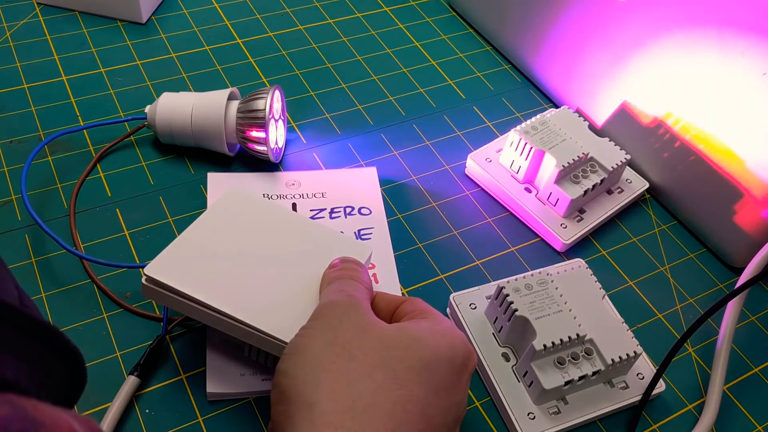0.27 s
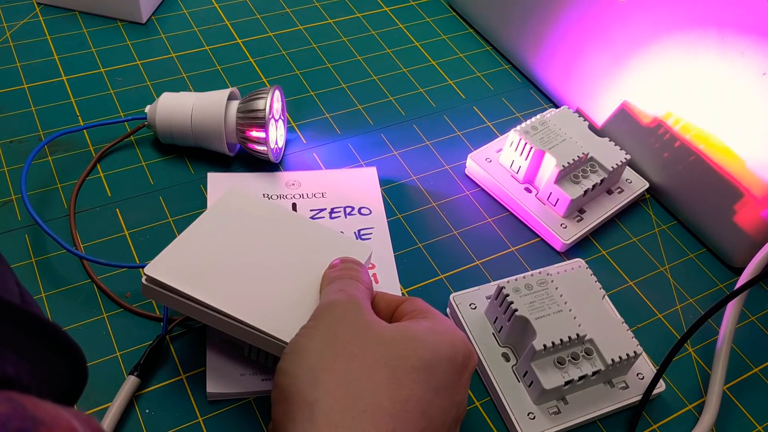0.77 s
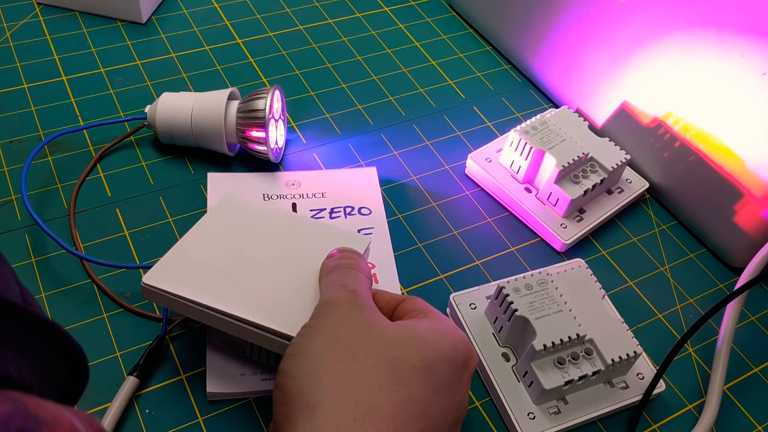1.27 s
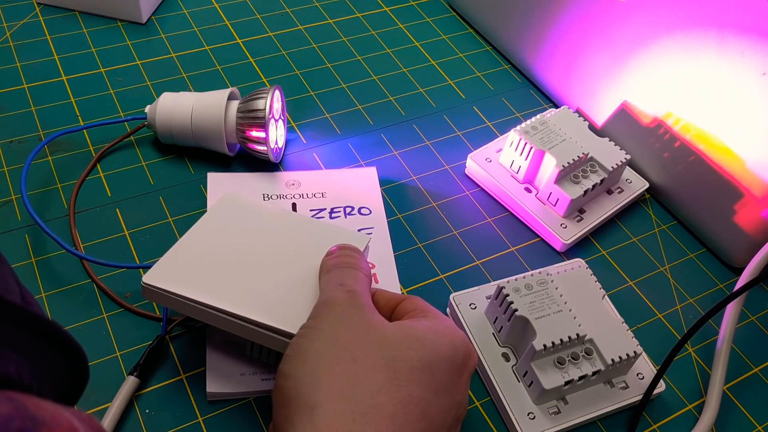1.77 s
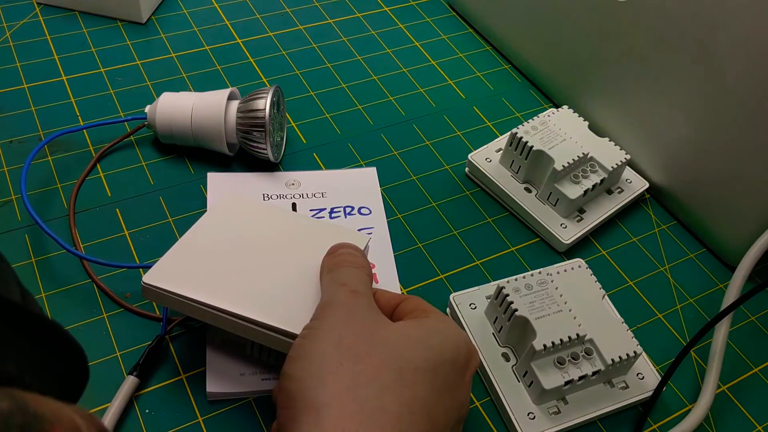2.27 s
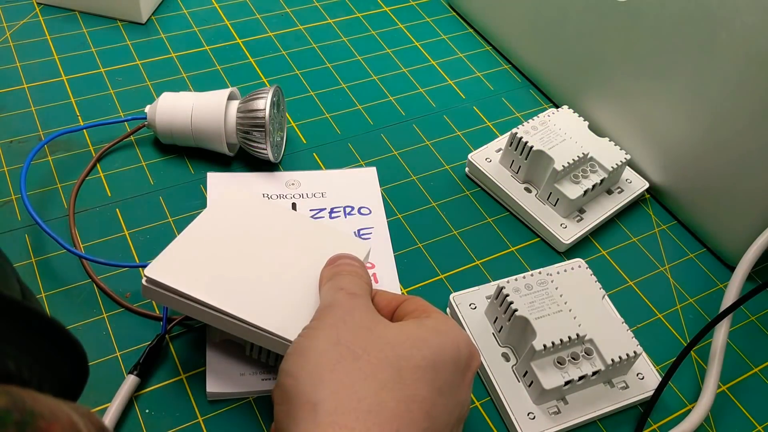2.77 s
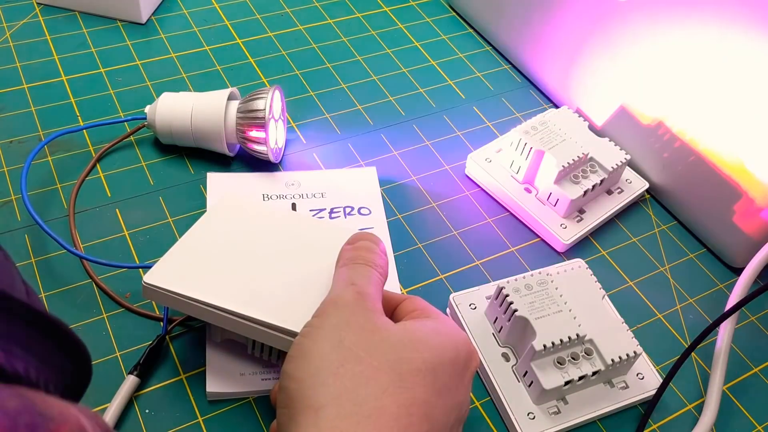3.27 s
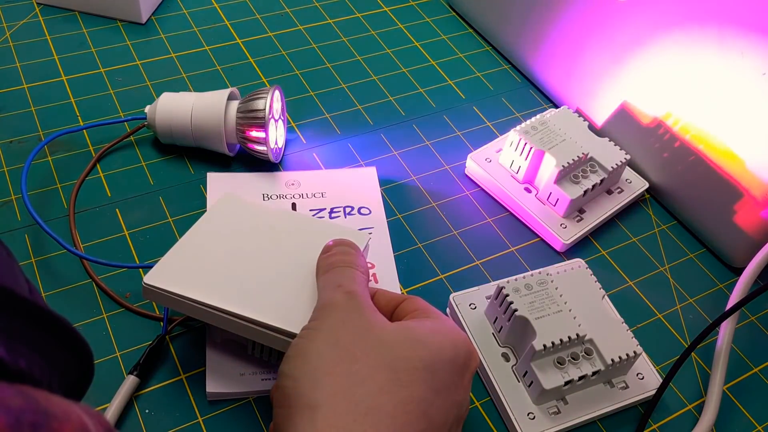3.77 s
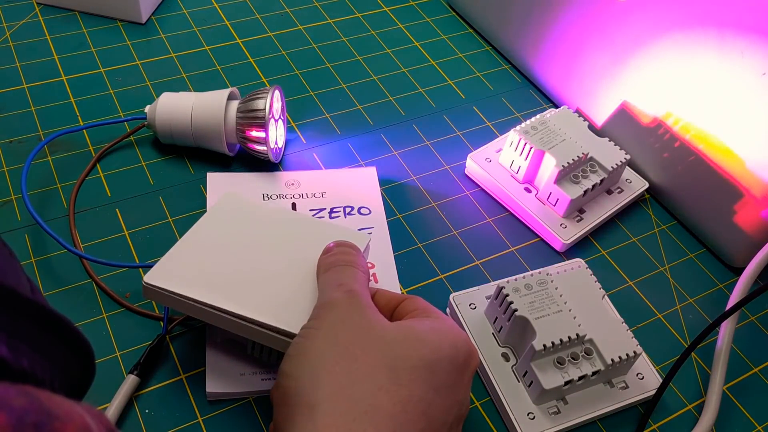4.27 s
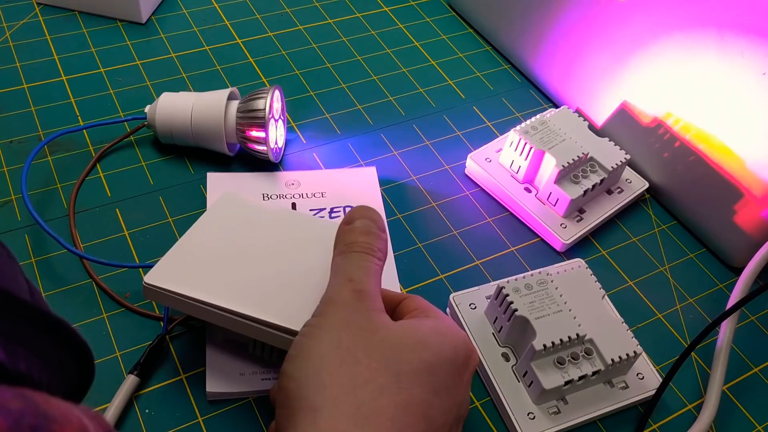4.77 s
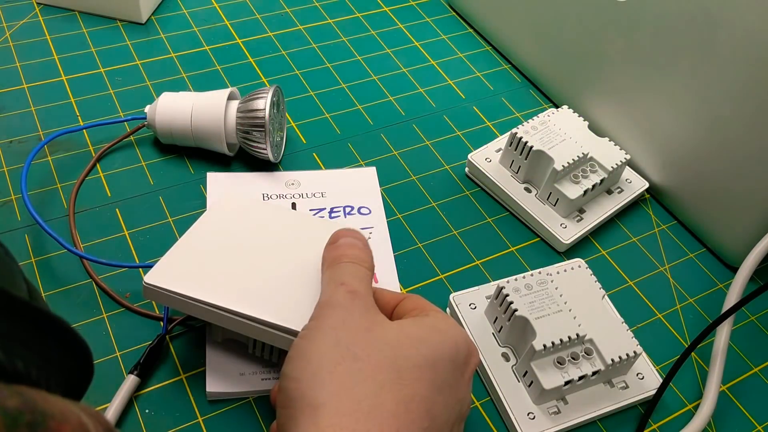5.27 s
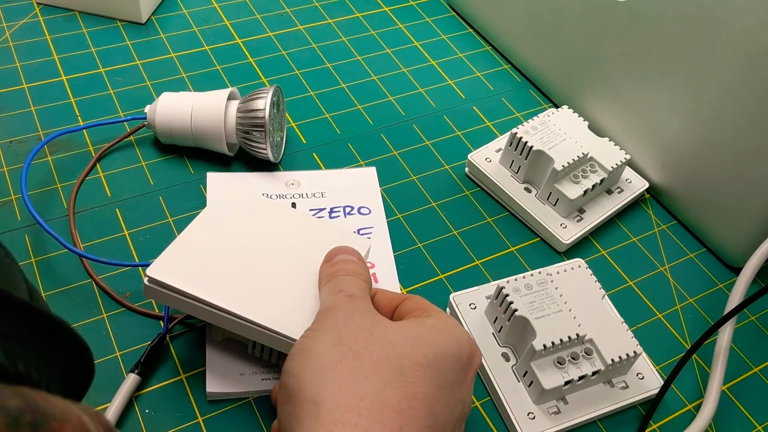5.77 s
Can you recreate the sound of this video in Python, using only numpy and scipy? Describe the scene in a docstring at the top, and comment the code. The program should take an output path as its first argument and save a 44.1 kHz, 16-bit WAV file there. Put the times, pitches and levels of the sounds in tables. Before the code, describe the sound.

Close, sharp clicks of a plastic light switch, three spaced and three rapid, as its loose housing knocks on a desk.

```python
"""A plastic rocker switch, held on a desk in a small room, is pressed and let go six times.
At first a thumb brushes the plate over mains hum and hiss. Then come three slow presses: each takes
up the slack with a tick and snaps over; each release knocks softly, ticks, pings and thumps the desk.
During the second and third the thumb rubs and the loose housing clacks. Three quick presses follow,
the last held through one more clack. After its release the thumb bumps softly on the plate."""
import sys
import numpy as np
from scipy import signal
from scipy.fft import rfft, irfft, next_fast_len
from scipy.io import wavfile
from scipy.ndimage import map_coordinates

SR = 44100
rng = np.random.default_rng(int(sys.argv[2]) if len(sys.argv) > 2 else 0)


def dump(signal):
    """Clip the signal to [-1, 1] and save it as 16-bit WAV at the path in sys.argv[1]."""
    limited = np.clip(np.atleast_2d(signal).T, -1, 1)
    pcm = np.round(limited * 32767).astype(np.int16)
    wavfile.write(sys.argv[1], SR, pcm)


N = 265526
HIT = 16384  # samples that hold one impact and its tail

# The rocker snaps over: start_s, level_db, rebound_hz, tick_lead_s
PRESSES = [(1.3437, -22.5, 1950, .0908), (1.8017, -21.5, 2260, 0.036), (3.0661, -19, 1820, .0287),
           (4.4241, -21.5, 2286, .0388), (4.6396, -20.5, 1780, .0252), (4.8118, -18.5, 3970, .0179)]
# The held rocker settles with a faint tick: start_s, level_db, tilt_db_per_octave
SETTLES = [(3.172, -57.5, 2)]
# The rocker springs back: start_s, level_db
RELEASES = [(1.4703, -36.5), (2.7744, -35.5), (4.162, -35.5), (4.509, -36), (4.6957, -35.5), (5.5337, -37)]
# The housing falls flat: start_s, level_db, tilt_db_per_octave, edge_lead_s, thump_db
CLACKS = [(2.4220, -23, 0.5, 0.0066, -35), (3.4031, -31, 6, .0115, -25.5),
          (5.1256, -24.5, 0.5, .0128, -39.5)]
# The housing knocks on the desk: start_s, level_db, tilt_db_per_octave
KNOCKS = [(3.3625, -26, -2.5), (3.3695, -25.5, -2.5), (3.391, -29, -4.5)]
# The thumb lands on the plate: start_s, level_db, tilt_db_per_octave
BUMPS = [(2.096, -49, 5.5), (2.261, -59, 18), (3.298, -55.5, 6), (3.336, -42, -3), (5.970, -43.5, -2.5),
         (5.998, -51, 4)]
# The thumb slides over the plate: peak_s, level_db, spread_s
STROKES = [(0.03, -67.5, 0.094), (2.228, -70.5, 0.056), (2.405, -50.5, 0.017), (2.588, -70.5, 0.0085),
           (3.385, -53.5, 0.024), (5.087, -50.5, .02), (5.95, -67, .02)]

# Normal modes of each struck part: pitch_hz, bandwidth_hz, level_db
SLACK_MODES = [(379.5, 150, -18), (740, 90, -10), (950, 120, -10), (1710, 220, -1), (2500, 450, -7.5),
               (3170, 350, -14), (4250, 250, -8.5), (5600, 600, -17.5), (11300, 1200, -18.5)]
SNAP_MODES = [(233.5, 12, -4), (323, 140, -15.5), (568.4, 44, 5.5), (780, 66, -5), (1065, 230, 1),
              (1384, 136, 3), (1874, 98, -2), (2290, 260, -3), (2616, 230, 0), (3174, 57, -6.5),
              (3410, 150, -11.5), (4230, 220, -7), (4565, 110, -6), (5660, 244, -6.5), (7025, 200, -4),
              (9200, 460, -16), (10070, 500, -16), (11400, 1200, -14), (13370, 510, -12), (15200, 450, -17)]
SPRING_MODES = [(360, 560, -15.5), (1370, 280, -5), (1653, 310, -3), (2600, 910, -15.5)]
RETURN_MODES = [(146, 20, -12), (230, 10, 1), (370, 120, -5), (737, 90, -5), (975, 200, -9.5),
                (1420, 140, -21), (1663, 140, 3.5), (1765, 230, 0.5), (2350, 140, -3), (3050, 500, -10),
                (3704, 130, -18), (4010, 510, -7), (4640, 250, -9), (5650, 420, -13), (8690, 75, -4),
                (9500, 810, -10.5), (11980, 910, 4), (11815, 710, 2.5), (14100, 970, -15.5)]
HOUSING_MODES = [(159, 200, -24.5), (411, 190, -4.5), (505, 65, 5.5), (790, 136, -5), (1080, 179, 1),
                 (1370, 120, 1.5), (1829, 260, 0.5), (2390, 236, 2), (3130, 380, -8), (3980, 300, -7.5),
                 (5690, 840, -14), (8510, 530, -15), (12300, 3000, -30.5)]
DESK_MODES = [(240, 55, -18), (316.1, 14.6, -9), (377.4, 64, -9.5), (496, 40.6, -1.5), (672, 34.7, 0),
              (795, 155, -7), (1130, 28, -34.5)]
PLATE_MODES = [(233, 130, -10), (380, 60, 1.5), (490, 61, -3.5), (695, 120, -12)]

# Spectra of skin friction, reverberation, microphone hiss and room rumble: frequency_hz, level_db
RUB_SPECTRUM = [(100, -32.5), (280, -0.5), (480, -1), (750, -8), (1200, -11.5), (2400, -15.5),
                (5000, -24.5), (15000, -39.5)]
ROOM_SPECTRUM = [(100, 7.5), (230, -2), (600, -3), (1200, -1.5), (2500, -2.5), (4500, 2.5), (7000, -4.5),
                 (9000, 3.5), (15000, 3.5)]
HISS_SPECTRUM = [(60, -28.5), (160, -6), (330, -4), (450, -8.5), (800, -11.5), (1800, -16), (4000, -14.5),
                 (6100, -12), (7300, -23), (8400, -24.5), (9600, -15.5), (11000, -18.5), (13200, -24),
                 (15200, -22.5), (16000, -17.5)]
RUMBLE_SPECTRUM = [(20, -38.5), (32, -12.5), (45, 1.5), (70, -6.5), (130, -7.5), (220, -29.5), (400, -50.5)]
# Reverberation time of the room: frequency_hz, t60_s
ROOM_T60 = [(100, 0.5), (240, 0.19), (600, 0.11), (2000, 0.13), (5000, 0.14), (15000, 0.098)]


def presses(tick_db=-23, tick_tilt_db=-1.5, snap_tilt_db=0.31):
    """Snap-through: the slack closes with a tick, then the rocker flips and strikes its stop."""
    ticks = [(s - lead, db + tick_db, tick_tilt_db) for s, db, _, lead in PRESSES]
    snaps = [(s, db, snap_tilt_db, rebound_hz) for s, db, rebound_hz, _ in PRESSES]
    ticking = impacts(ticks + SETTLES, SLACK_MODES, span_s=0.00074, wet_db=-6.5)
    return ticking + impacts(snaps, SNAP_MODES, span_s=0.0013, wet_db=-7.5)


def releases(spring_lead_s=0.0065, return_tilt_db=-0.25, sway_delay_s=0.0017):
    """Stored elastic energy is freed: the spring knocks and pings, the rocker returns, the desk sways."""
    spring_hits = [(s - spring_lead_s, db - 8.5, 0) for s, db in RELEASES]
    return_hits = [(s, db, return_tilt_db) for s, db in RELEASES]
    spring = impacts(spring_hits, SPRING_MODES, span_s=0.0012, wet_db=2, soft_hz=4850)
    returns = impacts(return_hits, RETURN_MODES, span_s=0.0018, wet_db=-5)
    ping = damped_mode([(s, db - 15) for s, db in RELEASES], hz=8500, t60_s=0.099, attack_s=0.001)
    desk_hits = [(s + sway_delay_s, db - 6) for s, db in RELEASES]
    sway = damped_mode(desk_hits, hz=80, t60_s=0.25, attack_s=0.0034)
    return spring + returns + ping + sway


def clacks(edge_db=-5.5, edge_tilt_db=5, thump_delay_s=0.008):
    """Double impact: the tipped housing meets the desk edge first, then falls flat with a thump."""
    edges = [(s - lead, db + edge_db, edge_tilt_db) for s, db, _, lead, _ in CLACKS]
    falls = [row[:3] for row in CLACKS]
    loads = [(s + thump_delay_s, thump_db) for s, *_, thump_db in CLACKS]
    thumps = damped_mode(loads, hz=68.3, t60_s=0.13, attack_s=0.0071)
    return impacts(edges + falls, HOUSING_MODES, span_s=0.002, wet_db=0, shade_db=9) + thumps


def knocks(edge_db=-12, edge_tilt_db=1):
    """Free vibration: the housing knocks the desk; the hardest blow leaves a thump and a faint ring."""
    first_s, first_db, _ = KNOCKS[0]
    edge_hit = (first_s, first_db + edge_db, edge_tilt_db)
    edge = impacts([edge_hit], HOUSING_MODES, span_s=0.0026, wet_db=-1.5, shade_db=9)
    desk = impacts(KNOCKS, DESK_MODES, span_s=0.0025, wet_db=-1.5, soft_hz=2530)
    s, db, _ = max(KNOCKS, key=lambda row: row[1])
    thump = damped_mode([(s, db - 9.5)], hz=116.7, t60_s=0.27, attack_s=0.0025)
    after_ring = damped_mode([(s, db - 27.5)], hz=319, t60_s=0.79, attack_s=0.011)
    return edge + desk + thump + after_ring


def thumb_bumps():
    """Compliant contact: the soft pad of the thumb excites only the plate's low modes."""
    return impacts(BUMPS, PLATE_MODES, span_s=0.004, wet_db=-1, soft_hz=700)


def thumb_rubbing(grain_db=3, slips_per_s=250, taper=0.73):
    """Stick-slip friction: skin on plastic makes a grainy noise that follows the thumb's speed."""
    t = np.arange(N) / SR
    speed = sum(amp(db) / (1 + ((t - s) / spread) ** 2) ** taper for s, db, spread in STROKES)
    grain = map_coordinates(rng.standard_normal(HIT), [t * slips_per_s], order=1)
    return speed * unit(noise(RUB_SPECTRUM) * amp(grain_db * grain))


def impacts(hits, modes, span_s, wet_db, shade_db=0, soft_hz=None, rebound=0.2):
    """Source and filter: each contact force drives a part's modes, heard directly and via the room."""
    out = np.zeros(N)
    for s, db, tilt_db, *rebound_hz in hits:
        force = contact_force(span_s)
        part = gripped(modes, tilt_db)
        if rebound_hz:  # one bounce off the hard stop acts as a comb filter
            force = filtered(force, lambda f: 1 + rebound * np.exp(-2j * np.pi * f / rebound_hz[0]))
        if soft_hz:  # padded contacts lose their treble
            force = filtered(force, lambda f: 1 / (1 + 1j * f / soft_hz) ** 2)
        direct = resonate(force, part)
        reverberant = room(resonate(force, diffused(part, shade_db)))
        add(out, s, amp(db) * (direct + amp(wet_db) * reverberant))
    return out


def contact_force(span_s):
    """Broadband excitation: a burst of micro-impacts dies away within a few spans."""
    age = np.arange(HIT) / SR / span_s
    envelope = age ** (1 / 4) * np.exp(-age)
    force = rng.standard_normal(HIT)
    for _ in range(3):  # alternately confine the burst and flatten its spectrum
        phase = np.angle(rfft(force * envelope))
        force = irfft(np.exp(1j * phase))
    return force * np.exp(-(age / 4) ** 2)


def gripped(modes, tilt_db, vary_db=1.5, detune=0.0078):
    """Perturbation: each grip shifts the high modes most; tilt_db per octave sets the brightness."""
    hz, width, db = np.transpose(modes)
    pitch_shift, level_shift = rng.standard_normal((2, len(hz))) * np.minimum(hz / 4000, 1)
    levels = db + vary_db * level_shift + tilt_db * np.log2(hz / 2000)
    return np.column_stack([hz * (1 + detune * pitch_shift), width, levels])


def resonate(force, modes):
    """Modal superposition: resonances add with alternating sign, scaled to the energy of 5 ms at rms 1."""
    def response(f):
        return sum((-1) ** k * amp(db) * 1j * f * width / (hz * hz - f * f + 1j * f * width)
                   for k, (hz, width, db) in enumerate(modes))
    sound = filtered(force, response)
    return sound / np.linalg.norm(sound) * np.sqrt(0.005 * SR)


def damped_mode(hits, hz, t60_s, attack_s):
    """Damped oscillator: each (start_s, level_db) hit starts a sine that decays exponentially."""
    out, t = np.zeros(N), np.arange(HIT * 2) / SR
    envelope = np.exp(-np.log(1000) * t / t60_s) * (1 - np.exp(-t / attack_s))
    ring = -np.sin(2 * np.pi * hz * t) * envelope
    for s, db in hits:
        add(out, s, amp(db) * ring)
    return out


def diffused(modes, shade_db):
    """Radiation to all sides: high peaks blur, and the hand shades the treble by shade_db per octave."""
    hz, width, db = modes.T
    broadening = 1 + (hz / 2000) ** 2 / (1 + (hz / 2800) ** 2)
    levels = db - 10 * np.log10(broadening) - shade_db * np.log2(1 + hz / 2000)
    return np.column_stack([hz, width * broadening, levels])


def room(x):
    """Reverberation: reflections from desk and walls form a noise tail whose bass lasts longest."""
    hz, t, spectrum = signal.stft(rng.standard_normal(HIT), SR, nperseg=256)
    decay = amp(-60 * t / along(ROOM_T60, hz)[:, None])
    tail = signal.istft(spectrum * decay, SR, nperseg=256)[1]
    tail *= 1 - np.exp(-(np.arange(len(tail)) / SR / 0.0004) ** 2)  # reflections build up
    tail = filtered(tail / np.linalg.norm(tail), lambda f: amp(along(ROOM_SPECTRUM, f)))
    return signal.fftconvolve(x, tail)[:len(x)]


def background(mains_hz=100, whine_hz=10800, whine_width_hz=170):
    """Noise floor: steady mains hum, microphone hiss, room rumble and a faint narrow-band whine."""
    hum = amp(-58) * unit(np.sin(2 * np.pi * mains_hz * np.arange(N) / SR))
    whine = filtered(rng.standard_normal(N), lambda f: 1 / (1 + ((f - whine_hz) / whine_width_hz) ** 2))
    hiss = amp(-69) * noise(HISS_SPECTRUM)
    rumble = amp(-67) * noise(RUMBLE_SPECTRUM)
    return hum + hiss + rumble + amp(-80) * unit(whine)


def noise(spectrum):
    """Spectral shaping: white noise is coloured and brought to rms 1."""
    return unit(filtered(rng.standard_normal(N), lambda hz: amp(along(spectrum, hz))))


def filtered(x, response):
    """Linear filtering: the spectrum of x is multiplied by a frequency response."""
    size = next_fast_len(len(x) + HIT)
    hz = np.fft.rfftfreq(size, 1 / SR)
    return irfft(rfft(x, size) * response(hz), size)[:len(x)]


def along(points, hz):
    """Interpolation of (frequency_hz, value) points on a logarithmic frequency axis."""
    frequencies, values = np.transpose(points)
    return np.interp(np.log(hz + 1), np.log(frequencies + 1), values)


def amp(db):
    """Amplitude ratio of a level in decibels."""
    return 10 ** (np.asarray(db) / 20)


def unit(x):
    """Normalisation to rms 1."""
    return x / np.sqrt(np.mean(x ** 2) + 1e-20)


def add(track, start_s, sound):
    """Superposition of a delayed sound on the track."""
    part = track[round(start_s * SR):][:len(sound)]
    part += sound[:len(part)]


def scene():
    """Superposition: the pressures of all sources add at one close microphone."""
    return (presses() + releases() + thumb_bumps() + clacks() + knocks() + thumb_rubbing()
            + background())[None]


def record(dry):
    """Band limiting: the microphone drops bass below 36 Hz, the recorder treble above 15.9 kHz."""
    thin = signal.sosfilt(signal.butter(2, 36, "highpass", fs=SR, output="sos"), dry)
    return np.array([filtered(x, lambda hz: 1 / (1 + (hz / 15900) ** 120)) for x in thin])


dry = scene()
out = record(dry)
dump(out)
```